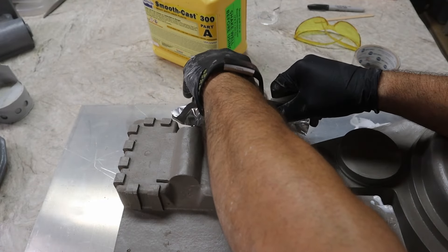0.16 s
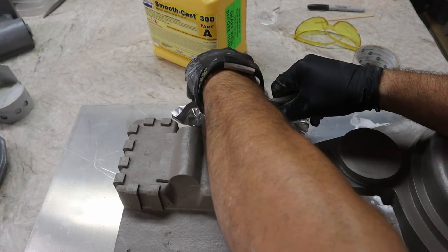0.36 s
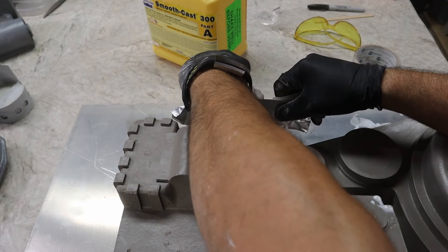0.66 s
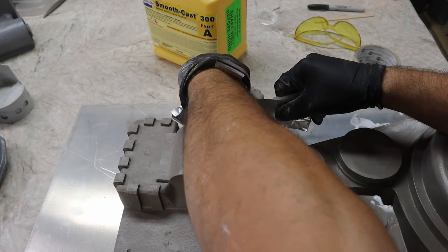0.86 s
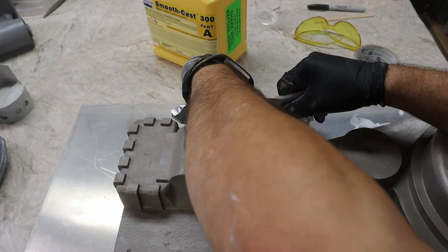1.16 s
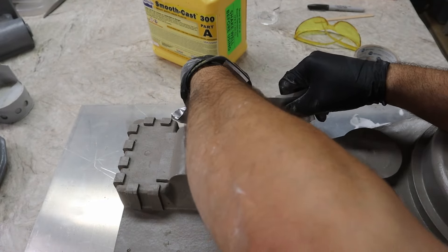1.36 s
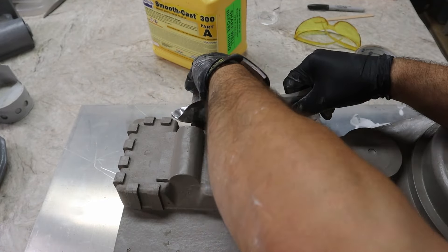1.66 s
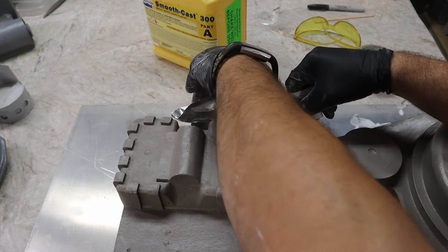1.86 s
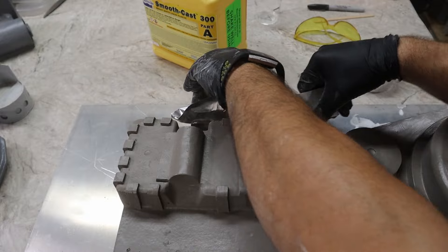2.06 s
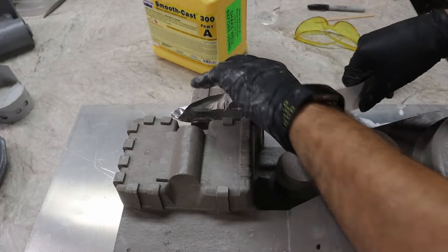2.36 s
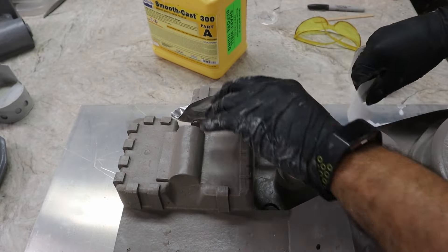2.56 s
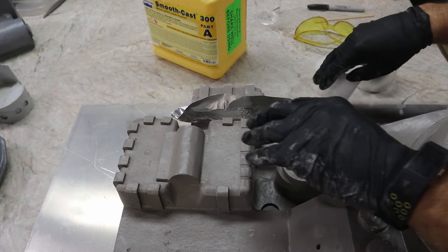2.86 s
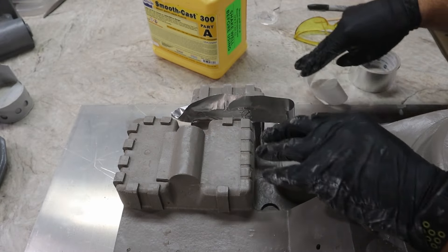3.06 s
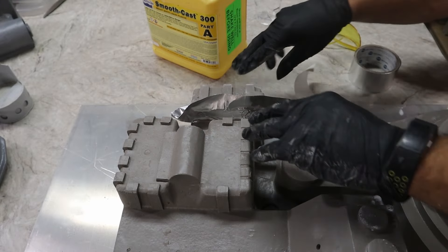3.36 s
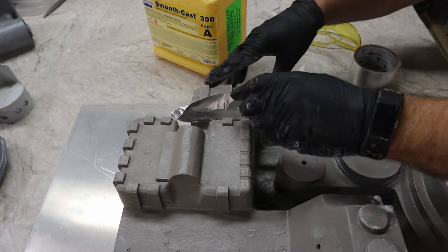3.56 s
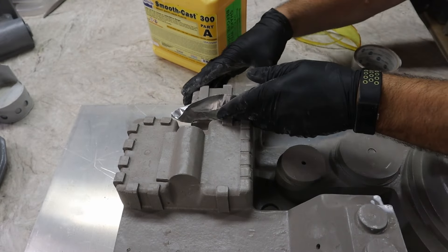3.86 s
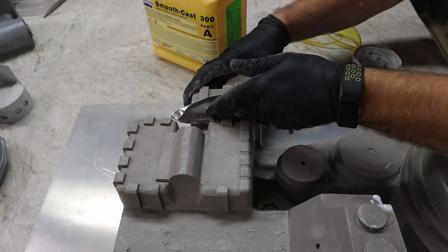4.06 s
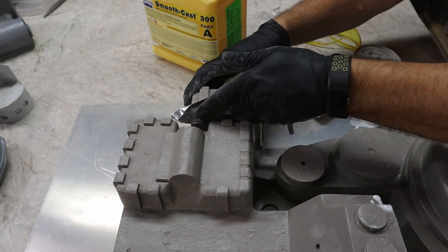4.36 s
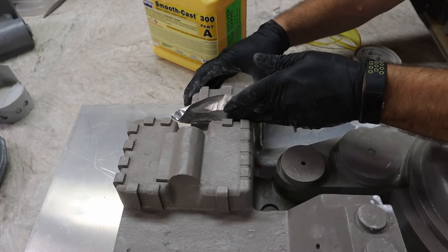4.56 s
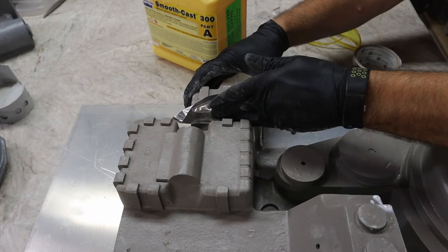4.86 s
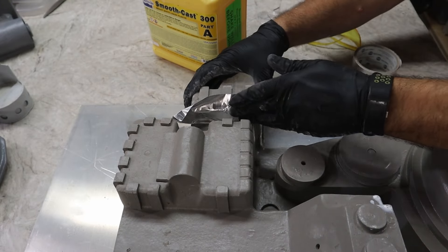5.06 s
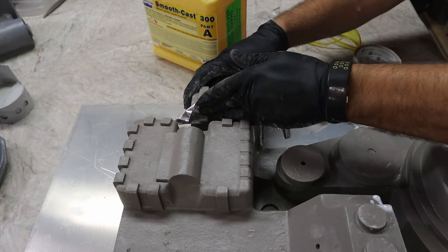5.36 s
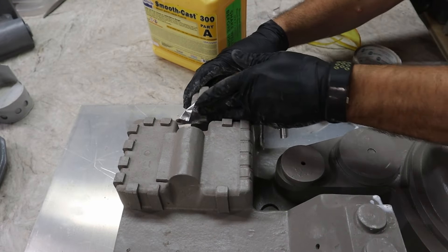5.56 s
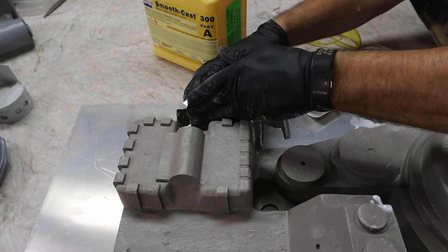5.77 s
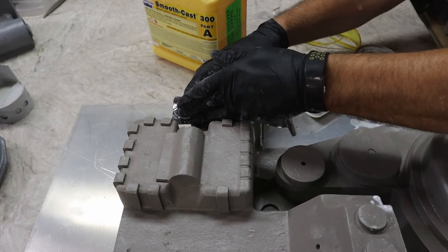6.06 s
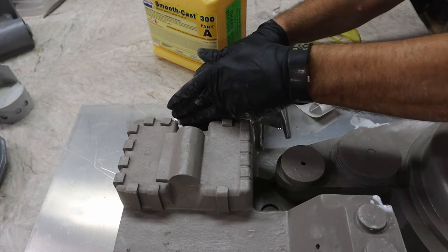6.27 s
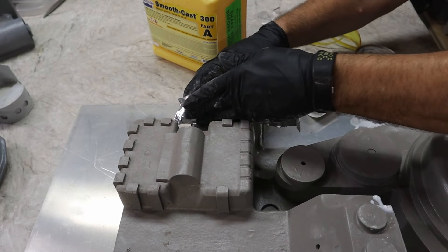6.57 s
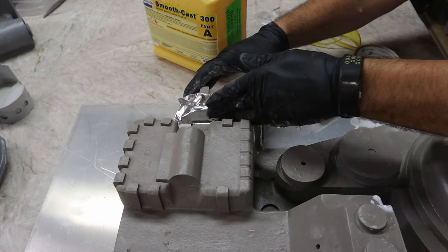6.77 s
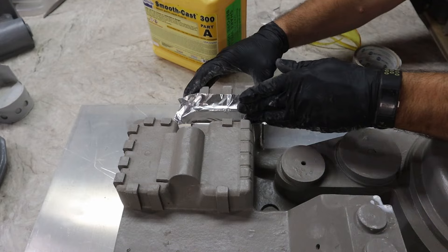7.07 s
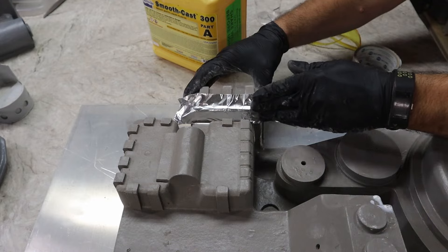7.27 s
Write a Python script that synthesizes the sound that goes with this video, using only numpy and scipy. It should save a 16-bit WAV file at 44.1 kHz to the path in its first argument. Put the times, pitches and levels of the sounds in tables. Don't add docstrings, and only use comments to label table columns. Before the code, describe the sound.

Foil tape crinkles, snaps and scrapes under gloved fingers while the hollow casting beneath gives dull knocks and low booms, very close.

```python
import sys
import numpy as np
from scipy import signal
from scipy.fft import rfft, irfft, next_fast_len
from scipy.io import wavfile
from scipy.ndimage import uniform_filter1d

SR = 44100
rng = np.random.default_rng(int(sys.argv[2]) if len(sys.argv) > 2 else 0)


def convert_level_to_amplitude(level_db):
    exponent = np.asarray(level_db, float) / 20
    return 10 ** exponent


def master(y):
    cut = np.clip(np.atleast_2d(y).T, -1, 1)
    pcm = np.round(cut * 32767)
    wavfile.write(sys.argv[1], SR, pcm.astype(np.int16))


N = 326384

# start in seconds,
# length in seconds, crinkle level in dB, glove scuff relative to it in dB, change over the stroke in dB.
PEEL_STROKES = [(0.0, 0.15, -37.5, 10.5, -35), (.198, 0.13, -48, 12, -5), (.36, 0.11, -79.5, 13.5, 19),
                (.47, 0.17, -54.5, 7.5, 2), (.7, 0.052, -53.5, 9.5, -3), (.826, 0.073, -66, 14.5, 0.5),
                (.952, 0.35, -59, 13.5, 1.5), (1.309, 0.11, -66, 20, 4.5),
                (1.495, 0.18, -49.5, 20.5, -10.5), (1.697, 0.18, -43.5, 5, -24),
                (1.84, 0.05, -50.5, 3.5, 0), (1.94, 0.087, -47, 5.5, -7), (2.062, 0.12, -50, 9.5, -2),
                (2.196, 0.037, -43.5, 22.5, -13.5), (2.285, 0.13, -44, -4, -3.5),
                (2.427, 0.077, -38, -1, 7.5), (2.505, 0.024, -42, 1, -1), (2.55, 0.12, -43, 9.5, -8.5),
                (2.655, 0.024, -40.5, 2.5, -2.5), (2.69, 0.12, -32, 2.5, -15),
                (2.83, 0.094, -56.5, -17, -5), (2.958, 0.12, -32, -3.5, -12), (3.1, 0.087, -43, -8.5, 4),
                (3.298, 0.063, -39.5, -9.5, 7)]
PRESS_STROKES = [(3.51, 0.041, -43, -2, -30), (3.6, 0.063, -74.5, -28, 17), (3.817, 0.16, -47, 2, -1.5),
                 (4.057, 0.2, -52.5, 8, -9.5), (4.21, 0.077, -50.5, 1.5, -3.5), (4.28, 0.078, -47.5, 5, -5),
                 (4.461, 0.058, -65.5, 5, 22.5), (4.53, 0.076, -44.5, -3, -8.5),
                 (4.609, 0.03, -41.5, 6, -10), (4.818, 0.078, -38, -12, -42), (4.956, 0.1, -51.5, 15, -16),
                 (5.075, 0.089, -51.5, 9, -17), (5.218, 0.11, -46.5, 3.5, -11),
                 (5.348, 0.091, -47, 5.5, -1.5), (5.505, 0.051, -74.5, 1, 22.5), (5.673, 0.1, -53.5, 6, 13),
                 (5.859, 0.17, -45.5, 5.5, -2), (6.125, 0.062, -56.5, 2, 8.5),
                 (6.278, 0.16, -50.5, 6.5, -7), (6.418, 0.043, -47.5, 25.5, -31),
                 (6.501, 0.045, -61, 4.5, 7), (6.545, 0.2, -47, 4, -5.5), (6.781, 0.18, -50.5, 5, 4),
                 (6.98, 0.062, -56.5, 5.5, 9.5), (7.055, 0.12, -34.5, -37, -12.5),
                 (7.195, 0.1, -37, 0.5, -24.5), (7.329, 0.12, -50, 3, 2)]
STROKES = PEEL_STROKES + PRESS_STROKES
STROKE_ATTACK_S, CRINKLE_RELEASE_DB_PER_S, SCUFF_RELEASE_DB_PER_S = 0.014, 361, 153
FLUTTER_DB = 0.88
WAKE_CRINKLE_DB, WAKE_SCUFF_DB, WAKE_FADE_DB_PER_S = -72, -18.5, 595

# pitch in Hz, level in dB per Hz.
CRINKLE_COLOUR = [(710, -34), (1200, -3), (2680, 3), (5170, -1), (5550, -2), (8290, -3.5), (9090, -9.5),
                  (14000, 3.5)]
# pitch in Hz, level in dB per Hz.
SCUFF_COLOUR = [(240, -36), (400, 1), (678, -12.5), (932, -5.5), (1100, -9), (2120, -13), (2290, -8),
                (2710, -21), (5000, -22), (6500, -53), (11000, -120)]
# pitch in Hz, width in Hz, level in dB.
SHEET_MODES = [(560, 23, -7.5), (655, 52, -3.5), (750, 17, -3.5), (905, 39, -3), (1210, 7.7, -6.5),
               (1990, 33, -6), (2800, 64, -31.5), (3770, 18, -8), (4640, 28, -9), (5630, 58, -12)]

# time in seconds, peak in dB, ring in Hz, bright edge relative to it in dB.
PEEL_SNAPS = [(0.0255, -13, 1940, -16.5), (0.174, -26, 1940, -29), (0.2035, -20.5, 2000, -16),
              (0.2718, -24, 2560, -15), (0.3275, -30, 2090, -23), (0.5142, -31.5, 2110, -8),
              (0.703, -25.5, 2200, -51), (0.9615, -31, 1200, -17), (0.9844, -50.5, 1290, 19),
              (1.014, -26, 1230, -18.5), (1.0441, -29, 1460, -20), (1.0711, -30.5, 5130, -31),
              (1.088, -32, 2600, -27), (1.0995, -33, 2400, -29), (1.116, -31, 2540, -25),
              (1.1895, -32, 1620, -5), (1.227, -35, 2460, -3), (1.2652, -28, 2530, -44),
              (1.2905, -24.5, 1030, -10), (1.3092, -20.5, 1770, 4.5), (1.3746, -28, 1210, -20),
              (1.3913, -29, 1190, -21), (1.4128, -64, 2000, -25), (1.563, -24.5, 910, -8),
              (1.579, -28, 925, -9), (1.6085, -27.5, 910, -4), (1.6457, -22, 2150, -21),
              (1.683, -28, 1200, -4), (1.6972, -4, 2350, -11)]
TEAR_SNAPS = [(2.078, -23.5, 5800, -16), (2.091, -17.5, 2190, -44), (2.195, -11, 2320, -11.5),
              (2.4368, -12, 3970, -11), (2.476, -14, 4300, -29), (2.4889, -2.5, 1940, -31),
              (2.5556, -16.5, 3500, -17), (2.5956, -18.5, 2140, -34), (2.699, -18, 2040, -33),
              (2.7221, -14, 6960, -13), (2.9553, -14, 2600, -6), (3.0078, -9, 2350, -15),
              (3.0498, -15, 2800, 0), (3.3008, -28.5, 3400, -8), (3.3257, -25, 3770, -10)]
PRESS_SNAPS = [(3.508, -31, 3100, -10), (3.823, -41, 4630, 1), (3.958, -28.5, 3000, -29),
               (4.0746, -45, 2450, -25), (4.616, -28.5, 3120, -10), (4.7014, -38.5, 2050, -59),
               (4.8193, -18.5, 1750, 8.5), (4.8649, -20.5, 2420, -1), (4.9681, -21.5, 2170, -33),
               (4.9782, -20, 4460, -29), (5.141, -29.5, 2180, -37), (5.223, -29.5, 3200, 4.5),
               (5.2731, -16, 5600, -20), (5.2818, -9.5, 1895, -65.5), (5.3536, -18.5, 2220, -45),
               (5.4124, -25, 1330, -7), (5.6792, -26, 3340, -25), (5.7305, -17, 2930, -15),
               (5.9804, -23.5, 2180, -2), (6.0096, -15, 4640, -6), (6.289, -27, 1460, -34),
               (6.434, -51, 1820, -62), (6.5424, -35.5, 1460, -10), (6.5576, -52, 2830, -8),
               (6.796, -47, 4550, -4), (6.916, -23.5, 2140, -23), (6.9792, -6, 3200, -26),
               (7.0534, -27, 4910, -4), (7.077, -31, 5460, -8), (7.096, -20, 5470, -13),
               (7.1802, -26.5, 2080, -31), (7.2055, -35, 3100, 0), (7.2161, -24.5, 3020, -6),
               (7.2785, -31, 2060, -22), (7.3472, -28.5, 2300, -29), (7.371, -25.5, 6460, 0)]
SNAPS = PEEL_SNAPS + TEAR_SNAPS + PRESS_SNAPS
PING_S, PING_SAG_PER_S = 0.0095, 5

# start in seconds, length in seconds,
# level in dB, pitch in Hz, width in Hz.
PEEL_FOLDS = [(0.176, 0.011, -38.5, 600, 300), (0.209, 0.016, -35, 2020, 503), (0.21, 0.011, -39, 990, 250),
              (0.211, 0.014, -30.5, 495, 200), (0.26, 0.015, -47, 2560, 500),
              (0.701, 0.0089, -39, 940, 600), (0.951, 0.015, -46.5, 870, 250),
              (1.089, 0.023, -47, 890, 150), (1.183, 0.011, -44, 930, 200), (1.23, 0.012, -49, 895, 200),
              (1.261, 0.01, -40, 870, 200), (1.303, 0.017, -41.5, 2450, 300), (1.36, 0.033, -48, 905, 250),
              (1.5, 0.1, -39.5, 930, 390), (2.434, 0.045, -42, 790, 450), (2.248, 0.03, -28, 560, 121),
              (2.43, 0.026, -36.5, 2140, 500), (2.485, 0.018, -23.5, 4000, 2520),
              (2.483, 0.031, -32, 760, 450), (2.558, 0.023, -43.5, 4850, 3000),
              (2.654, 0.041, -51, 2320, 800), (2.727, 0.06, -41, 1970, 500), (2.956, 0.026, -33, 2920, 920),
              (3.137, 0.048, -64, 2170, 600), (3.324, 0.074, -37.5, 1800, 1210)]
PRESS_FOLDS = [(5.281, 0.0094, -30, 3850, 1200), (5.223, 0.023, -43.5, 3380, 1500),
               (4.29, 0.052, -60, 2200, 800), (5.354, 0.012, -38.5, 3100, 1480),
               (5.735, 0.046, -36, 740, 250), (5.739, 0.075, -43.5, 2100, 500),
               (5.88, 0.038, -37.5, 1930, 400), (5.901, 0.046, -39, 890, 200),
               (6.549, 0.14, -51, 2400, 905), (6.56, 0.12, -55, 970, 100), (6.8, 0.052, -62, 5600, 151),
               (6.801, 0.11, -51, 4120, 700), (6.84, 0.12, -50.5, 654, 78.5), (6.84, 0.084, -62, 940, 80),
               (6.985, 0.027, -41, 750, 150), (6.985, 0.017, -45, 3570, 150), (7.05, 0.071, -56, 5260, 900),
               (7.09, 0.038, -49, 3000, 700), (7.206, 0.035, -54, 3000, 700),
               (7.259, 0.024, -49.5, 580, 150)]
FOLDS = PEEL_FOLDS + PRESS_FOLDS
FOLD_ATTACK_S, FOLD_RELEASE_S, FOLD_ROUGH_DB = 0.005, 0.005, 3

# time in seconds, peak in dB, pitch in Hz, swell in milliseconds.
PEEL_KNOCKS = [(0.021, -22, 729, 7.7), (0.03, -20.5, 247, 3.6), (0.209, -22.5, 530, 2.4),
               (0.254, -23, 228, 7.1), (0.29, -32, 249, 4), (0.322, -13, 249, 5.5), (0.335, -16.5, 226, 6),
               (.56, -32, 284, 4), (0.605, -27, 282.5, 11), (0.826, -27.5, 258, 3.6), (0.96, -27, 268, 5.1),
               (.997, -29, 304, 6.7), (1.015, -20, 264, 5.4), (1.029, -19.5, 263, 4),
               (1.046, -22, 270, 6.6), (1.061, -23, 245, 3), (1.072, -19, 246, 3.7), (1.09, -24, 251, 5.3),
               (1.104, -19.5, 261, 4.5), (1.118, -23.5, 256, 9), (1.14, -32, 248, 5.6),
               (1.175, -23, 252, 3.1), (1.193, -19.5, 254, 4.7), (1.228, -29, 280, 5.3),
               (1.267, -25, 277, 7.3), (1.293, -21, 290, 4.5), (1.377, -23, 290, 5.8),
               (1.515, -18.5, 192, 10), (1.543, -13, 270, 8.1), (1.566, -14.5, 305, 13),
               (1.611, -14, 260, 5.3), (1.646, -18.5, 301, 7.2), (1.685, -13.5, 302, 5.9),
               (1.838, -31, 318, 4.6), (2.065, -34, 294, 9), (2.108, -14, 215, 4.2), (2.127, -19, 211, 6.4),
               (2.208, -25, 298, 8.8), (2.254, 1, 323, 6), (2.273, -8, 251, 6.1), (2.487, -22.5, 309, 11.3),
               (2.405, -33, 303, 14), (2.58, -25, 304, 11.4), (2.67, -29.5, 300, 7.5),
               (2.699, -29, 300, 10)]
PRESS_KNOCKS = [(4.127, -11.5, 235, 5.8), (4.143, -15, 230, 4.5), (4.167, -28.5, 170, 3.5),
                (4.214, -35.5, 231, 15), (4.377, -21, 247, 4.3), (4.627, -31.5, 299, 5.5),
                (4.819, -34, 530, 3.4), (4.866, -35.5, 336, 8.3), (4.89, -29.5, 310, 5),
                (5.134, -30.5, 332, 3.9), (5.146, -29.5, 464, 3.5), (5.164, -36, 284, 5.3),
                (5.33, -26.5, 248, 12), (5.413, -33, 646, 8.4), (5.453, -20.5, 249, 7),
                (5.778, -13.5, 322, 4.6), (5.792, -2, 311, 5.3), (5.804, -9, 273, 6.2),
                (5.821, -22, 278, 15), (5.858, -14.5, 290, 6.3), (5.871, -15, 301, 5),
                (5.884, -5.5, 273.5, 5.5), (5.893, -15, 348, 9.2), (5.903, -9, 358, 6.5),
                (5.916, -26, 426, 7.6), (5.925, -20, 440, 7.8), (5.945, -31, 376, 11.6),
                (6.008, -28.5, 257, 12), (6.13, -33.5, 194, 7.3), (6.291, -19, 362, 8.1),
                (6.312, -26, 334, 10), (6.429, -23, 237, 3.8), (6.727, -31.5, 662, 6.7),
                (6.92, -24.5, 253, 3.5), (6.981, -22.5, 750, 5.1), (7.217, -26.5, 313, 4.5)]
KNOCKS = PEEL_KNOCKS + PRESS_KNOCKS
BENCH_SHARE = 0.566
KNOCK_ROUNDNESS = 1.46

# time in seconds, boom in dB, pitch of the air pocket in Hz.
HOLLOW = [
    (0.0, -52, 282.4),
    (2.53, -57.5, 292),
    (3.65, -66.5, 286.2),
    (4.04, -56.5, 279.5),
    (7.4, -59, 288.8),
]
# pitch in Hz, width in Hz, level in dB.
CASTING_MODES = [(113, 75, -9), (242.4, 26, 4.5), (297, 39, -2), (333, 13.8, 5), (567, 64, -27),
                 (745, 30, -20.5), (1000, 170, -19.5)]
BOOM_FOLLOWS = 0.63

# time in seconds, level in dB.
LEANING = [(0.0, -45), (0.97, -51), (1.03, -42), (1.32, -38), (1.34, -52), (1.61, -38.5), (1.85, -48.5),
           (2.37, -45), (2.39, -47), (3.42, -48.5), (3.46, -81), (4.35, -48), (4.41, -59), (5.4, -48.5),
           (5.65, -57), (5.71, -46), (5.91, -52.5), (7.4, -55)]
BENCH_IDLE_DB = -57.5

# pitch in Hz, level in dB.
SHOP_AIR_COLOUR = [(15, -47.5), (25, -44), (117, 10.5), (180, 2), (256, -6.5), (624, -9.5), (2610, -16.5),
                   (11600, -28.5), (14000, -16), (16000, -60)]
SHOP_AIR_DB = -56
# pitch in Hz, time in seconds.
ECHO_TIME = [(200, 0.15), (1500, 0.2), (6000, 0.27), (14000, 0.11)]
ECHO_DB = -6

# time in seconds, share of mid (0 to 1) that pulls the image right.
HANDS = [(0, 0.25), (1.2, 0.2), (2.2, 0.29), (3.2, 0.27), (4.2, 0.23), (5.2, 0.2), (6.1, 0.2), (6.7, 0.23),
         (7.4, 0.46)]
# pitch in Hz, side relative to mid in dB.
SIDE_GAIN = [(40, -22), (125, -17), (250, -14), (500, -11), (1000, -6), (2000, -3.5), (4000, 2),
             (8000, 3.5), (12000, 5.5)]
MIC_TOP_HZ = 12020
GATE_FALL_DB_PER_S, GATE_DEPTH_DB, BOOM_GATED, BENCH_GATED = 198, 5, 0.5, 1


def rms_one(x):
    return x / np.sqrt(np.mean(x ** 2) + 1e-20)


def in_time(rows):
    s, *columns = np.transpose(rows)
    return [np.interp(np.arange(N) / SR, s, c) for c in columns]


def at_hz(points, hz):
    table_hz, values = np.transpose(points)
    return np.interp(np.log(hz + 1), np.log(table_hz + 1), values)


def shaped(x, response):
    size = next_fast_len(N + SR)
    hz = np.arange(size // 2 + 1) * SR / size
    return irfft(rfft(x, size) * response(hz), size)[..., :N]


def drift(rate_hz):
    r = np.exp(-2 * np.pi * rate_hz / SR)
    noise = rng.standard_normal(N + SR)
    return rms_one(signal.lfilter([1], [1, -2 * r, r * r], noise)[SR:])


def resonance(x, hz, width_hz):
    r = np.exp(-np.pi * width_hz / SR)
    top = np.array([1, 0, -1]) * (1 - r * r) / 2
    return signal.lfilter(top, [1, -2 * r * np.cos(2 * np.pi * hz / SR), r * r], x)


def grains(per_s, spread_db, clump_db):
    sizes = convert_level_to_amplitude(spread_db * np.minimum(rng.exponential(1, N), 5)) * rng.choice([-1, 1], N)
    happens = rng.random(N) < per_s * convert_level_to_amplitude(clump_db * drift(25)) / SR
    return sizes * happens + 1e-18


def rustle():
    t, power = np.arange(0, N, 32) / SR, 1e-10
    release = np.array([[CRINKLE_RELEASE_DB_PER_S], [SCUFF_RELEASE_DB_PER_S]])
    for s, length, db, scuff_db, change_db in STROKES:
        held_db = db + change_db * np.clip((t - s) / length, 0, 1) + np.array([[0], [scuff_db]])
        attack = np.clip((t - s) / STROKE_ATTACK_S, 0, 1)
        power = power + (attack * convert_level_to_amplitude(held_db - release * np.maximum(t - s - length, 0))) ** 2
    for s, db, *_ in SNAPS:
        wake_db = db + np.array([[WAKE_CRINKLE_DB], [WAKE_SCUFF_DB]])
        power = power + (t > s) * convert_level_to_amplitude(wake_db - WAKE_FADE_DB_PER_S * np.abs(t - s)) ** 2
    return [np.interp(np.arange(N) / SR, t, 10 * np.log10(p)) for p in power]


def buckles(colour, low_hz, high_hz, per_s, cycles, spread_db, patchy_db, level_db):
    slips = grains(per_s, spread_db, clump_db=3.0) * rng.choice([-1, 1], (2, N))
    dealt = rng.integers(0, 14, (2, N))
    rings = 0
    for k, hz in enumerate(np.geomspace(low_hz, high_hz, 14)):
        loudness = convert_level_to_amplitude(at_hz(colour, hz) + patchy_db * drift(9.6))
        rings = rings + loudness * resonance(slips * (dealt == k), hz, hz / cycles)
    return convert_level_to_amplitude(level_db) * rms_one(rings)


def ticks(level_db):
    spray = rng.standard_normal((2, 512)) * np.exp(-np.arange(512) / SR / 0.0037)
    slips = grains(200, spread_db=4.0, clump_db=5.0)
    clicks = signal.fftconvolve(slips[None], spray, axes=1)[:, :N]
    return convert_level_to_amplitude(level_db) * rms_one(resonance(resonance(clicks, 2200, 4000), 2200, 6000))


def sheet(x):
    return x + sum(convert_level_to_amplitude(db + 7.0) * resonance(x, hz, width_hz) for hz, width_hz, db in SHEET_MODES)


def snaps():
    out, t = np.zeros((2, N + 4096)), np.arange(4096) / SR
    chance = rng.standard_normal((len(SNAPS), 2, 2, 4096))
    for (s, db, hz, edge_db), (hiss, spray) in zip(SNAPS, chance):
        struck = convert_level_to_amplitude(3.0) * np.sin(2 * np.pi * hz * t) * np.exp(-t / 0.0012)
        ring = convert_level_to_amplitude(-4.0) * rms_one(resonance(spray, hz, hz * 0.17)) * np.exp(-t / 0.0061)
        body = convert_level_to_amplitude(-12.0) * rms_one(resonance(hiss, hz, hz * 0.95)) * np.exp(-t / 0.01)
        edge = convert_level_to_amplitude(edge_db + 7.5) * hiss * np.exp(-t / 0.00084)
        broad = convert_level_to_amplitude(-4.5 + 0.5 * edge_db) * hiss * np.exp(-t / 0.0097)
        ping = np.sin(2 * np.pi * hz * t * (1.04 - PING_SAG_PER_S * t)) * np.exp(-(t / PING_S) ** 2)
        tone = convert_level_to_amplitude(-36.0 - 0.66 * edge_db) * ping
        both = (struck + tone) * [[1], [-0.6]]
        at = round(s * SR)
        out[:, at:at + 4096] += convert_level_to_amplitude(db - 9.5) * (both + ring + body + edge + broad)
    return signal.sosfilt(signal.butter(2, 600, "high", fs=SR, output="sos"), out[:, :N])


def folds():
    out, t = np.zeros((2, N + 8192)), np.arange(8192) / SR
    chance = rng.standard_normal((len(FOLDS), 3, 8192))
    for (s, length, db, hz, width_hz), noise in zip(FOLDS, chance):
        rough = convert_level_to_amplitude(FOLD_ROUGH_DB * rms_one(uniform_filter1d(noise[2], size=120)))
        held = np.clip(t / FOLD_ATTACK_S, 0, 1) * np.exp(-np.maximum(t - length, 0) / FOLD_RELEASE_S)
        facet = resonance(resonance(noise[:2] * rough, hz, width_hz), hz, 2 * width_hz)
        at = round(s * SR)
        out[:, at:at + 8192] += convert_level_to_amplitude(db) * held * rms_one(facet)
    return out[:, :N]


def knocks():
    out, t = np.zeros(N + 8192), np.arange(8192) / SR
    rattles = rms_one(resonance(rng.standard_normal((len(KNOCKS), 8192)), 904, 160))
    for (s, db, hz, swell_ms), rattle in zip(KNOCKS, rattles):
        modes = convert_level_to_amplitude(-22.5) * rattle
        for ratio, share in [(1, 1), (1.3, 0.25), (0.76, 0.11), (2.0, 0.084)]:
            modes = modes + share * np.sin(2 * np.pi * ratio * hz * t)
        grown = 1000 * t / max(swell_ms, 2)
        swell = (grown * np.exp(1 - grown)) ** KNOCK_ROUNDNESS
        bench = convert_level_to_amplitude(-15) * np.sin(2 * np.pi * BENCH_SHARE * min(hz, 290) * t) * np.exp(-t / 0.022)
        at = round((s - 0.003) * SR)
        out[at:at + 8192] += convert_level_to_amplitude(db - 4.0) * (modes * swell + bench)
    return out[:N]


def rubbing():
    boom_db, pocket_hz = in_time(HOLLOW)
    slips = grains(350, spread_db=3.5, clump_db=3.0)
    body = 0
    for k, (hz, width_hz, db) in enumerate(CASTING_MODES):
        body = body + convert_level_to_amplitude(db) * resonance(slips, hz, width_hz) * (-1) ** k
    wander = drift(32.0) + 1j * drift(20)
    pocket = np.real(wander * np.exp(2j * np.pi * np.cumsum(pocket_hz) / SR))
    return convert_level_to_amplitude(boom_db + 2.5) * (convert_level_to_amplitude(5.0) * rms_one(body) + convert_level_to_amplitude(-3.5) * pocket)


def rumble():
    band = signal.butter(3, [16, 95], "band", fs=SR, output="sos")
    low = signal.sosfilt(band, rng.standard_normal(N))
    return np.hypot(convert_level_to_amplitude(in_time(LEANING)[0] - 2.5), convert_level_to_amplitude(BENCH_IDLE_DB)) * rms_one(low)


def shop_air():
    air = shaped(rng.standard_normal((2, N)), lambda hz: convert_level_to_amplitude(at_hz(SHOP_AIR_COLOUR, hz)))
    return convert_level_to_amplitude(SHOP_AIR_DB + 2.0) * rms_one(air)


def shop_echo(x):
    t, tail = np.arange(SR // 2) / SR, 0
    for hz in 500 * 2 ** np.arange(5):
        edges = [hz / 2 ** 0.5, min(hz * 2 ** (0.5 + hz // 8000), 20000)]
        band = signal.butter(2, edges, "band", fs=SR, output="sos")
        noise = signal.sosfilt(band, rng.standard_normal((2, len(t))))
        tail = tail + noise * convert_level_to_amplitude(-60 * t / at_hz(ECHO_TIME, hz))
    tail = tail * (t > 0.004) / np.sqrt(np.sum(tail ** 2) / 2)
    return convert_level_to_amplitude(ECHO_DB) * signal.fftconvolve(x, tail, axes=1)[:, :N]


def gate():
    t, db = np.arange(N) / SR, np.zeros(N)
    for (s, length, *_), (opening, *_) in zip(STROKES, STROKES[1:]):
        db -= np.clip(GATE_FALL_DB_PER_S * (t - s - length), 0, GATE_DEPTH_DB) * (t < opening)
    return uniform_filter1d(convert_level_to_amplitude(db), size=88)


def ports(views):
    mid, other = views
    lean = np.tanh(0.4 + 0.6 * drift(2.0))
    turned = np.imag(signal.hilbert(mid, next_fast_len(N)))[:N]
    side = lean * turned + np.sqrt(1 - lean ** 2) * other - in_time(HANDS)[0] * mid
    side = shaped(side, lambda hz: convert_level_to_amplitude(at_hz(SIDE_GAIN, hz)))
    return np.array([mid + side, mid - side])


def scene():
    crinkle_db, scuff_db = rustle() + FLUTTER_DB * drift(45)
    crinkle = buckles(CRINKLE_COLOUR, 1490, 14800, 12000, cycles=3.1, spread_db=1.5, patchy_db=4.0,
                      level_db=crinkle_db + 0.5)
    scuff = buckles(SCUFF_COLOUR, 420.0, 3876, 3500, cycles=8.5, spread_db=3.0, patchy_db=3.5,
                    level_db=scuff_db - 6.5)
    glints = buckles(CRINKLE_COLOUR, 2300, 9500, 1500, cycles=70.0, spread_db=3.0, patchy_db=4.0,
                     level_db=crinkle_db - 5.5)
    foil = sheet(crinkle + scuff + ticks(scuff_db - 26.5)) + glints + snaps() + folds()
    opened = gate()
    swing = convert_level_to_amplitude(BOOM_FOLLOWS * (scuff_db - np.median(scuff_db)))
    casting = rubbing() * opened ** BOOM_GATED * swing + knocks()
    near = foil + casting * [[1], [0]] + shop_air()
    echo = shop_echo(foil[1:]) * opened ** 0.35
    bench = ports([rumble(), rumble()]) * opened ** BENCH_GATED
    return (ports(near) + echo) * opened + bench


def top_cut(x):
    return signal.sosfilt(signal.butter(12, 16310, fs=SR, output="sos"), x)


def record(dry):
    faded = signal.sosfilt(signal.butter(6, MIC_TOP_HZ, fs=SR, output="sos"), dry)
    rounded = 0.9 * np.tanh(faded / 0.9)
    mix = signal.sosfilt(signal.cheby2(10, 50, 16400, fs=SR, output="sos"), rounded)
    return top_cut(mix)


dry = scene()
out = record(dry)
master(out)
```